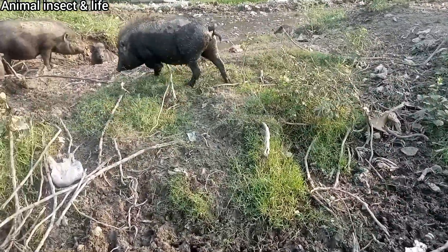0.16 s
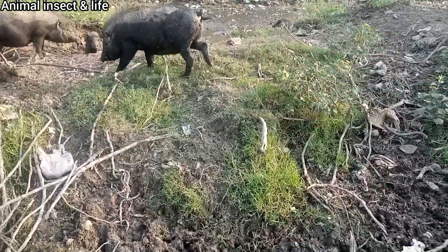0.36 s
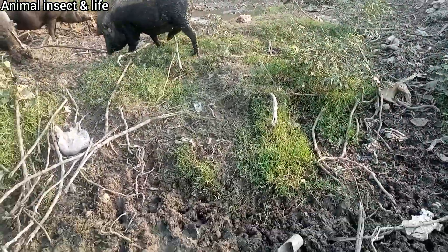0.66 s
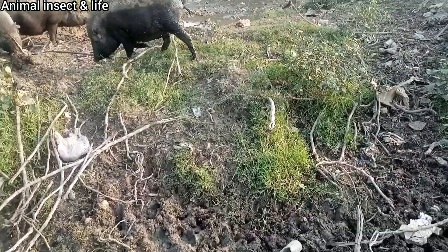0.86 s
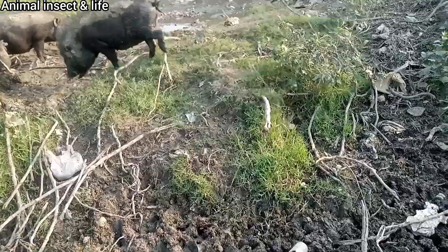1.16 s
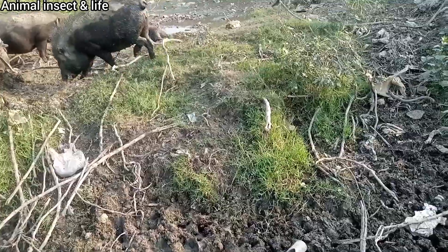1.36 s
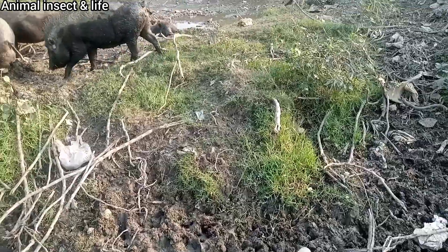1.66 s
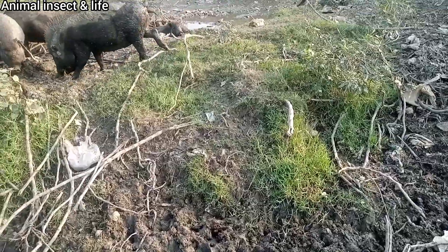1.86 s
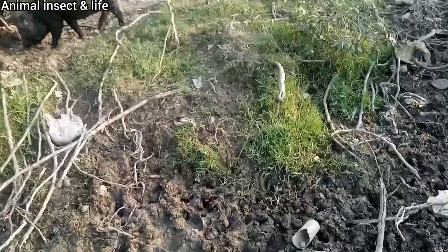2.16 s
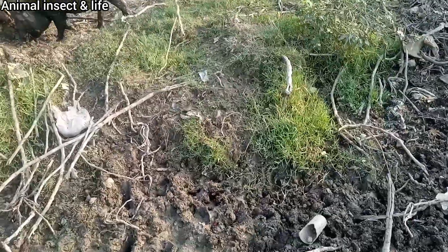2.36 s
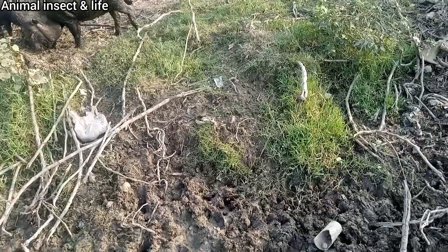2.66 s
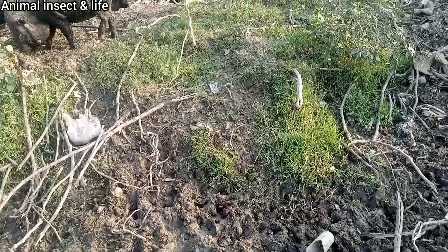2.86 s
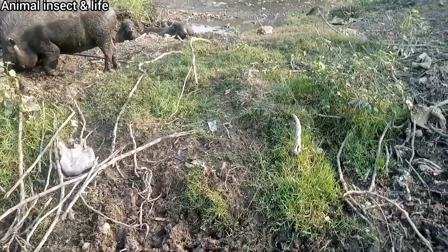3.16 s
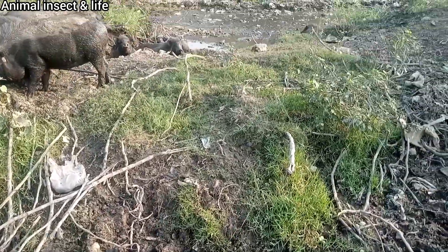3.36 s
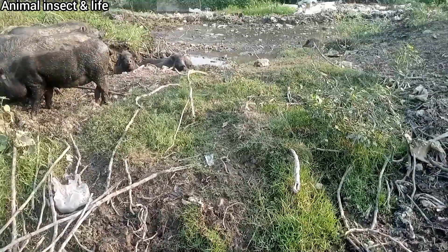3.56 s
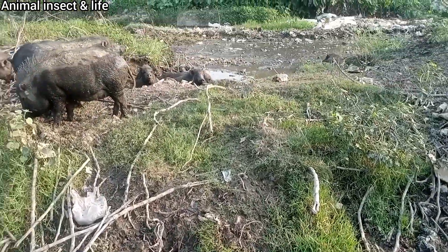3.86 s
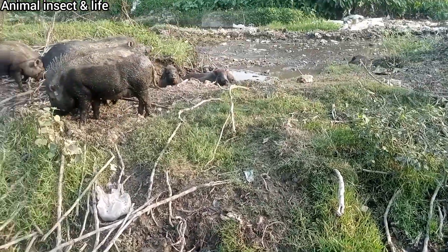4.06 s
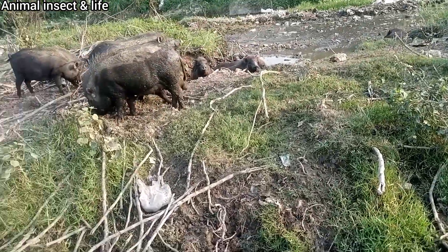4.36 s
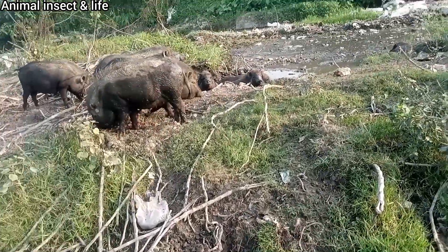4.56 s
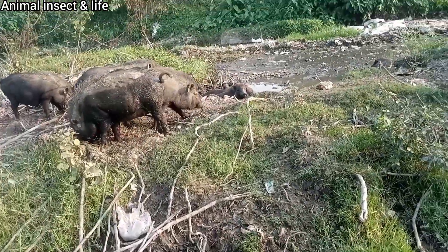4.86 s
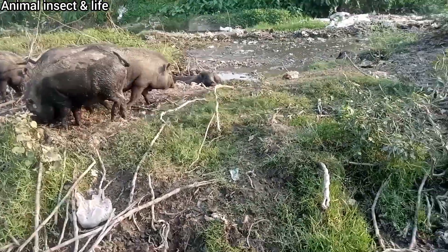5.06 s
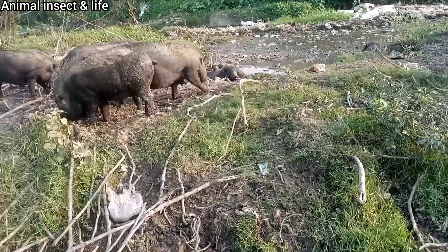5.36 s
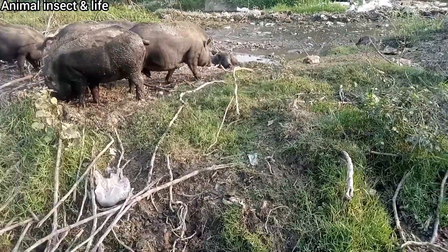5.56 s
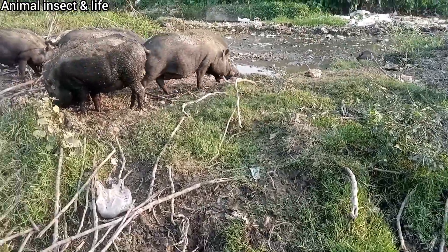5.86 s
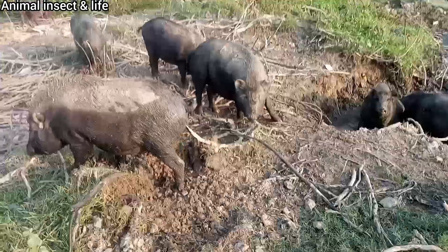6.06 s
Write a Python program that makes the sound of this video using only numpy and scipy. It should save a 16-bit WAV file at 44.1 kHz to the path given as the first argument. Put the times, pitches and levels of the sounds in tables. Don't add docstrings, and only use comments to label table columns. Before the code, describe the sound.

For about six seconds a continuous shrill twitter of hundreds of far birds fills the open air, slightly fluctuating. A faint low diesel pump throbs at a distance, growing a little after 3 s. A stalk snaps at once; buzzing calls follow around 0.25 s. From 0.85 to 1.3 s near birds burst into bright whistles, trills and babble, then buzz and tick at 1.5 s. Another loud cluster runs from 1.9 to 2.4 s, with faint nasal pig whimpers and a mud pop around 2.3 s. Calls thin somewhat, with hooked chirps at 3 s, a whimper and snap at 3.9 s, and harsh rasps at 4.2 and 4.5 s. Soft pulsing grunts come at 4.6 and 5.65 s. Dry crackles and leaf hisses recur throughout. More chatter and rasping follow at 5.1 to 5.9 s, a dull microphone bump near 6 s, then falling whistles. Short leafy echoes surround the near sounds.

```python
import sys
import numpy as np
from scipy import signal
from scipy.fft import rfft, irfft, next_fast_len
from scipy.io import wavfile
from scipy.ndimage import uniform_filter1d, map_coordinates

SR = 44100
rng = np.random.default_rng(int(sys.argv[2]) if len(sys.argv) > 2 else 0)


def field_ratio(decibels):
    return 10 ** (np.asarray(decibels, dtype=float) / 20)


def output_pcm(signal):
    pcm = np.clip(np.atleast_2d(signal).T, -1, 1) * 32767
    wavfile.write(sys.argv[1], SR, np.round(pcm).astype(np.int16))


N = 273420

# [t/s, level/dB]
FLOCK_LIVELINESS = [(0.0, -36.5), (0.22, -35), (0.41, -32.5), (0.79, -35.5), (1.59, -32), (1.76, -35),
                    (2.23, -33), (2.78, -37.5), (4.07, -36), (4.23, -33), (4.66, -35), (4.78, -40.5),
                    (5.02, -34.5), (5.3, -36), (5.51, -35.5), (6.2, -32.5)]
# [f/Hz, level per Hz/dB]
TWITTER_SPECTRUM = [(880, -73), (1500, -12.5), (1900, -7), (3080, 4.5), (4410, 1.5), (5410, -2.5),
                    (6000, -15.5), (7800, -29), (13200, -120)]
# [f/Hz, level per Hz/dB]
SHRILL_SPECTRUM = [(2940, -62), (5000, -15), (5650, 2.5), (6740, 7), (7620, -1), (10500, -21.5),
                   (13400, -37), (14800, -30), (15500, -39)]
# [t/s, level/dB]
PUMP_THROB = [(0.0, -52), (0.15, -53), (2.11, -51), (3.28, -47), (3.57, -48), (4.75, -44), (5.37, -46),
              (5.77, -45), (6.2, -50)]
# [multiple, level/dB]
FIRING_ORDERS = [(1, -37), (2, -8), (3, -9), (4, 0), (5, -5), (6, -5.5), (7, -5.5), (8, -13), (9, -11.5),
                 (10, -16), (11, -16.5)]
# [f/Hz, level per Hz/dB]
ROAR_SPECTRUM = [(18, -44), (30, -14.5), (124, 0.5), (160, -1.5), (241, -15), (358, -11.5), (470, -17.5),
                 (709, -9), (1000, -17.5), (1240, -14), (1870, -20.5), (2200, -33), (2860, -26),
                 (4840, -120)]
# [t/s, f/Hz, level/dB]
PIPS = [(.724, 6647, -35.5), (1.195, 3040, -31), (1.285, 3290, -22), (1.719, 3100, -27.5),
        (2.368, 3350, -23), (2.397, 3230, -17), (2.401, 6650, -29.5), (3.507, 2420, -35),
        (3.7, 3114, -34.5), (4.323, 4510, -31), (5.176, 4303, -25)]
# [t/s, length/s, f/Hz, level/dB]
HELD_NOTES = [(0.0, .012, 2340, -31), (.975, .003, 6660, -24), (.982, .003, 6750, -23),
              (1.003, .006, 7580, -29), (.908, .009, 2930, -21), (.02, .01, 3300, -37),
              (.045, .012, 3400, -36), (.066, .035, 3200, -38), (.69, .012, 2850, -35),
              (4.497, .008, 6700, -36), (1.885, .008, 6150, -34), (5.976, .007, 2650, -31),
              (5.403, .005, 4620, -35), (4.484, .01, 2650, -32), (4.503, .006, 2800, -33),
              (2.225, .04, 4200, -35), (2.44, .03, 2800, -33), (1.319, 0.007, 6680, -27.5),
              (1.315, 0.021, 3190, -21), (1.338, 0.035, 3276, -32.5), (1.356, 0.043, 2400, -44),
              (0.502, 0.008, 6500, -33), (2.098, 0.027, 7540, -34.5), (1.622, 0.039, 2940, -32),
              (1.761, 0.015, 3060, -24.5), (.92, 0.031, 2900, -34), (1.002, 0.0086, 3800, -28),
              (1.47, 0.023, 2150, -39), (1.445, .02, 6650, -38), (5.514, 0.024, 6550, -44),
              (0.212, 0.018, 3100, -44), (1.865, 0.03, 4960, -33), (2.056, 0.041, 3730, -26.5),
              (2.146, 0.0072, 2900, -33), (2.514, .018, 4480, -30), (2.627, 0.028, 2980, -33.5),
              (3.159, 0.032, 2820, -38), (3.5, 0.013, 3480, -35), (3.529, .03, 2600, -40),
              (3.745, .015, 2980, -37), (3.567, 0.039, 4830, -38), (3.75, .081, 4340, -35.5),
              (4.196, 0.031, 2700, -31.5), (4.267, 0.04, 4250, -34), (4.372, 0.15, 4346, -36.5),
              (4.583, 0.028, 2780, -30), (5.648, .037, 2740, -40), (5.791, 0.056, 1960, -44),
              (6.0, 0.074, 3300, -38), (6.09, 0.054, 5730, -33)]
# [t/s, length/s, f/Hz, level/dB]
BRASSY_NOTES = [
    (1.021, 0.018, 3387, -28.5),
    (1.041, 0.042, 3390, -22),
    (1.092, 0.04, 3370, -40),
    (2.197, 0.063, 3440, -34.5),
]
# [t/s, length/s, start f/Hz, end f/Hz, level/dB]
GLIDES = [(1.12, 0.058, 3650, 2340, -40), (1.204, 0.033, 3390, 4150, -29), (1.237, .03, 4150, 4800, -23),
          (1.205, 0.029, 6940, 7900, -32), (.16, .022, 4200, 5000, -37), (1.98, .014, 5550, 5350, -33),
          (2.008, 0.028, 4950, 4400, -27), (2.926, .015, 2470, 2900, -37), (2.944, .012, 2900, 2530, -34),
          (2.96, .01, 2600, 2900, -36), (5.38, .012, 5100, 5970, -43), (5.438, .012, 5030, 6300, -41),
          (1.615, .11, 3675, 3895, -29.5), (1.892, 0.038, 3960, 3580, -28), (2.033, 0.012, 2940, 2720, -23),
          (2.045, 0.084, 2400, 2900, -29), (2.092, 0.03, 3970, 3590, -26.5),
          (2.157, 0.0455, 2947, 3330, -26.5), (2.288, 0.034, 3590, 3950, -26),
          (2.33, 0.018, 4140, 4720, -22), (2.892, 0.028, 2665, 2140, -38),
          (3.024, 0.073, 2300, 2610, -39.5)]
# [t/s, length/s, start f/Hz, end f/Hz, level/dB]
SONG_STROKES = [(4.088, .007, 2600, 2900, -30), (4.098, .008, 2800, 3200, -27),
                (4.138, .01, 2500, 2900, -33), (4.153, .008, 3200, 2700, -31),
                (4.145, .022, 3750, 3900, -35), (4.025, .018, 3350, 3750, -36),
                (4.252, .03, 3900, 2500, -33), (4.682, .014, 4250, 3900, -28), (4.7, .033, 3650, 4150, -30),
                (4.737, .014, 4150, 4350, -29), (4.726, .009, 5300, 4800, -39),
                (4.768, .01, 4400, 3950, -31), (4.778, .008, 3950, 4300, -30), (4.8, .018, 4350, 3850, -30),
                (4.55, .035, 3200, 2800, -32), (.767, .065, 2080, 2330, -35),
                (2.305, .018, 7550, 8100, -31), (4.91, 0.097, 2010, 2320, -45),
                (5.195, 0.073, 3850, 4410, -32), (5.201, 0.046, 2850, 2950, -38.5),
                (5.361, 0.015, 4040, 4960, -32), (5.41, 0.026, 2950, 4800, -31.5),
                (5.478, 0.024, 2810, 4720, -29.5), (6.07, 0.035, 5350, 4750, -35.5),
                (6.108, 0.02, 4600, 3750, -27), (6.13, 0.033, 4550, 3100, -26),
                (6.162, .033, 3050, 2050, -34), (5.96, .022, 2950, 2500, -35)]
# [t/s, length/s, start f/Hz, end f/Hz, level/dB]
SWEEPS = [(.455, .027, 6300, 3720, -37.5), (.508, .024, 4300, 2677, -35), (.512, 0.032, 6400, 3300, -36),
          (.575, 0.02, 4300, 2700, -32.5), (.582, 0.031, 5800, 3330, -35), (3.778, .085, 3430, 2910, -35.5),
          (3.82, .06, 6600, 3810, -34), (3.88, 0.07, 3800, 3390, -40), (4.05, .024, 4450, 2700, -31.5),
          (4.11, .026, 4300, 2550, -34), (4.168, 0.039, 4850, 2670, -35.5), (5.455, .012, 4800, 2800, -32),
          (6.095, 0.036, 2430, 1586, -46)]
# [t/s, peak level/dB, ring level/dB]
STALK_SNAPS = [(0.0268, -29, 13), (0.636, -38, 9), (0.812, -40.5, -6), (1.3513, -30, -18),
               (2.8185, -37.5, 10), (3.566, -46.5, 3), (3.714, -41, 2), (3.937, -30, 4.5),
               (4.3373, -30.5, 6.5), (4.4811, -51.5, 18), (5.1213, -42.5, 23.5), (5.1864, -37, 11),
               (5.3574, -38, 2.5), (5.942, -35, 9), (6.0512, -33.5, 4)]
# [t/s, peak level/dB, f/Hz]
MUD_POPS = [
    (2.3047, -32.5, 1223),
    (2.65, -37, 1230),
    (4.567, -36.5, 1185),
]
# [t/s, syllables, period/s, f/Hz, level/dB]
TRILLS = [(.851, 3, .0255, 2960, -20), (1.902, 3, .032, 3170, -22), (1.901, 3, .032, 6340, -33),
          (1.988, 4, .0135, 3020, -25), (2.168, 3, .013, 3170, -22), (2.545, 3, .023, 3220, -30),
          (2.545, 3, .023, 2680, -33), (2.765, 3, .024, 2730, -33), (3.233, 4, .021, 3430, -33),
          (3.95, 6, .02, 2060, -43), (4.015, 3, .02, 2420, -35), (4.48, 4, .05, 8000, -46),
          (5.418, 3, .018, 2020, -43), (5.506, 3, .0197, 2520, -33), (5.562, 1, .024, 2520, -30),
          (3.391, 7, .0199, 4650, -35.5), (3.446, 1, .035, 2350, -37), (3.487, 1, .016, 2330, -37),
          (5.78, 4, .021, 6650, -43)]
# [t/s, syllables, period/s, start f/Hz, level/dB]
CHATTERS = [
    (4.806, 5, .018, 3550, -38),
    (5.503, 3, .0195, 3300, -30),
    (5.56, 1, .024, 3200, -28),
]
# [t/s, syllables, period/s, start f/Hz, level/dB]
TICKS = [(.152, 2, .017, 3300, -27), (.197, 2, .042, 3000, -32), (.2, 2, .041, 2200, -33),
         (.259, 2, .021, 3000, -39), (3.409, 3, .039, 7200, -36), (1.415, 1, .01, 2900, -36),
         (1.426, 1, .01, 3900, -29), (1.439, 4, .0134, 6600, -39), (1.493, 9, .0133, 6900, -31),
         (1.896, 3, .0325, 5300, -21), (5.393, 1, .01, 4900, -30), (5.456, 2, .024, 4400, -33),
         (5.482, 5, .0197, 4500, -30)]
# [t/s, syllables, period/s, start f/Hz, level/dB]
HOOKS = [
    (2.962, 1, .034, 5600, -35),
    (2.996, 2, .034, 5300, -33),
    (3.063, 3, .0335, 5200, -30.5),
]
# [t/s, syllables, period/s, start f/Hz, level/dB]
ZIGZAGS = [(3.392, 4, .04, 4450, -37)]
# [t/s, length/s, low f/Hz, high f/Hz, level/dB]
WARBLES = [
    (.366, .135, 2000, 2500, -35),
    (2.667, .19, 3000, 7600, -40),
    (5.228, .17, 2200, 3300, -37),
]
# [t/s, length/s]
LEAF_RUSTLES = [(.24, .25), (0.56, 0.083), (0.768, .045), (1.17, 0.04), (1.27, .07), (1.46, .17),
                (1.89, .09), (3.58, 0.089), (4.663, 0.029), (6.097, .07), (5.1, .14), (5.9, .16)]
# [t/s, length/s, centre f/Hz, pulse rate/Hz, level/dB]
BUZZES = [(1.245, .055, 6650, 90, -35), (3.97, .06, 4650, 170, -39), (.705, .05, 3100, 120, -36),
          (.245, 0.225, 3780, 150, -29), (0.27, 0.21, 3000, 125, -38.5), (1.43, 0.46, 2230, 180, -48),
          (1.425, 0.078, 3100, 150, -30.5), (1.02, 0.085, 2650, 110, -34.5), (.965, .05, 2450, 131, -37.5),
          (1.9, 0.1, 2550, 110, -37), (1.483, 0.131, 3610, 76, -23), (1.485, .13, 7480, 100, -34),
          (3.291, 0.19, 3380, 115, -41.5), (4.952, 0.11, 4250, 190, -43)]
# [t/s, length/s, start f/Hz, end f/Hz, level/dB]
RASPS = [(3.63, .115, 3550, 3550, -31), (4.212, .15, 3750, 4000, -28), (.26, .2, 6230, 6230, -46),
         (4.525, .17, 3500, 3700, -26.5), (5.102, .11, 3770, 3850, -29.5), (5.73, .185, 3500, 4000, -27.5),
         (5.37, .2, 3500, 3300, -39)]
# [t/s, length/s, start f/Hz, end f/Hz, level/dB]
BABBLES = [(0.86, .1, 3200, 4500, -33), (.925, .045, 4400, 4650, -29), (.965, .045, 4600, 4600, -31),
           (1.265, .07, 4800, 4500, -34), (4.03, .06, 4900, 4900, -40), (4.455, .06, 4500, 4300, -31),
           (1.27, .11, 2450, 2500, -38), (1.269, 0.12, 3340, 3204, -35.5), (1.617, 0.17, 3450, 3400, -31),
           (1.868, 0.13, 3600, 3400, -37), (1.956, .08, 5300, 4600, -31), (2.04, 0.095, 3610, 3800, -29),
           (2.349, 0.13, 3193, 2970, -30), (2.497, 0.18, 3570, 3350, -35.5), (3.03, 0.18, 3645, 3690, -33),
           (3.37, .17, 6300, 6200, -43), (2.48, .11, 4000, 4200, -35), (5.06, .06, 4300, 3800, -37),
           (2.86, .07, 2960, 2550, -38), (5.48, 0.093, 3800, 3600, -34), (4.714, 0.17, 4024, 2780, -46),
           (5.93, 0.22, 3500, 3480, -35.5)]
# [t/s, length/s, start f/Hz, end f/Hz, level/dB]
WHIMPERS = [
    (2.086, 0.11, 628, 657, -51.5),
    (2.273, 0.046, 670, 577, -48),
    (2.311, 0.0516, 802, 633, -50.5),
    (3.91, 0.087, 454, 556, -48.5),
]
# [t/s, length/s, pulse rate/Hz, level/dB]
GRUNTS = [
    (4.622, 0.31, 30, -45.5),
    (5.64, .28, 38, -43),
]
# [f/Hz, width/Hz, level/dB]
SNOUT = [
    (130, 110, -13),
    (253, 57, 2.5),
    (616, 120, -23),
]


def unit(x):
    return x / np.sqrt(np.mean(x ** 2) + 1e-20)


def along(points, hz):
    f, v = np.transpose(points)
    return np.interp(np.log(hz + 1), np.log(f + 1), v)


def curve(rows):
    s, values = np.transpose(rows)
    return np.interp(np.arange(N) / SR, s, values)


def wobble(rate, size=N):
    knots = rng.standard_normal(int(size * rate / SR) + 4)
    return map_coordinates(knots, [np.arange(size) * rate / SR])


def filtered(x, response):
    m = next_fast_len(N + SR // 2)
    return irfft(rfft(x, m) * response(np.fft.rfftfreq(m, 1 / SR)), m)[:N]


def modes(rows):
    def response(f):
        total = 0
        for k, (centre, width, db) in enumerate(rows):
            damping = 1j * f * width
            total = total + (-1) ** k * field_ratio(db) * damping / (centre ** 2 - f * f + damping)
        return total
    return response


def add(out, s, x):
    part = out[max(round(s * SR), 0):][:len(x)]
    part += x[:len(part)]


def voice(hz, second_db, third_db, edge):
    turn = 2 * np.pi * (np.cumsum(hz) / SR + rng.random())
    t = np.arange(len(hz)) / SR
    ends = np.sin(np.pi / 2 * np.clip(np.minimum(t, t[::-1]) / edge, 0, 1))
    overtones = field_ratio(second_db) * np.sin(2 * turn) + field_ratio(third_db) * np.sin(3 * turn)
    return ends * (np.sin(turn) + overtones)


def glide(length, start_hz, middle_hz, end_hz):
    u = np.linspace(0, 1, int(length * SR))
    return start_hz * (1 - u) * (1 - 2 * u) + 2 * middle_hz * u * (2 - 2 * u) + end_hz * u * (2 * u - 1)


def far_flock():
    u, layers = np.linspace(0, 1, 1600), []
    bands = ((TWITTER_SPECTRUM, 2000, 3200, 1), (SHRILL_SPECTRUM, 5200, 3200, 3))
    for spectrum, low_hz, span_hz, blur_db in bands:
        chirps = np.zeros(N)
        for when, pitch, slope, life, size in rng.random((1100, 5)):
            v = u[:int(300 + 1300 * life ** 2)]
            sweep_hz = 4200 * (slope - .65) * (1.1 - life)
            hz = low_hz + span_hz * pitch + sweep_hz * v / v[-1]
            tone = np.sin(2 * np.pi * np.cumsum(hz) / SR)
            add(chirps, when * N / SR, field_ratio(6 * size) * np.hanning(len(v)) * tone)
        echoes = field_ratio(blur_db + 3 * wobble(14) + 1.8 * wobble(4)) * rng.standard_normal(N)
        band = (span_hz / (SR / 2)) ** .5
        blend = band * unit(chirps) + echoes
        layers.append(unit(filtered(blend, lambda f: field_ratio(along(spectrum, f)))))
    lively_db = curve(FLOCK_LIVELINESS)
    mean_db = lively_db.mean()
    shrill_db = mean_db - 9.2 + 1.2 * (lively_db - mean_db)
    return field_ratio(lively_db - 3.7) * layers[0] + field_ratio(shrill_db) * layers[1]


def distant_pump():
    firing_hz, split_hz = 26.48, 520
    throb_db = curve(PUMP_THROB)
    turn = 2 * np.pi * np.cumsum(firing_hz * (1 + 0.00568 * wobble(1.544))) / SR
    orders = np.zeros(N)
    for k, db in FIRING_ORDERS:
        phase = k * turn + 0.1006 * k * k + 0.83 * wobble(6)
        orders += field_ratio(db + 1.16 * wobble(7.3)) * np.cos(phase)
    pulsed = rng.standard_normal(N) * (1 + 0.2 * np.cos(turn))
    roar = unit(filtered(pulsed, lambda f: field_ratio(along(ROAR_SPECTRUM, f))))
    low = filtered(roar, lambda f: 1 / (1 + (f / split_hz) ** 8))
    swell_db, parts = throb_db - throb_db.mean(), np.zeros(N)
    for grows, part in ((1.1, low), (.45, roar - low)):
        parts += field_ratio(grows * swell_db + .6 * wobble(3) + 1.4 * wobble(10)) * part
    return field_ratio(throb_db - 0.8) * unit(orders) + field_ratio(-46.4) * parts


def whistles():
    pure_db, brassy_db = (-18, -22), (-5, -9.5)

    def arch(hz, share):
        return hz * (1 - share), hz, hz * (1 - share)

    calls = [(s, .0183, arch(hz, .0406), db, pure_db) for s, hz, db in PIPS]
    for rows, partials_db in ((HELD_NOTES, pure_db), (BRASSY_NOTES, brassy_db)):
        calls += [(s, length, arch(hz, .012), db, partials_db) for s, length, hz, db in rows]
    for rows, done in ((GLIDES, .5), (SONG_STROKES, .5), (SWEEPS, .73)):
        calls += [(s, length, (a, a + done * (b - a), b), db, pure_db) for s, length, a, b, db in rows]
    out = np.zeros(N)
    for s, length, pitch, db, partials_db in calls:
        hz = np.pad(glide(length, *pitch), 130, "edge")
        hz = hz + 28 * wobble(400, len(hz))
        flutter = field_ratio(db + 1.8 * wobble(190, len(hz)))
        add(out, s - .003, flutter * voice(hz, *partials_db, edge=0.005))
    return out


def trees(x):
    t = np.arange(SR // 4) / SR
    tail = rng.standard_normal(len(t)) * field_ratio(-60 * t / 0.089) * (1 - np.exp(-t / 0.0059))
    return signal.fftconvolve(x, tail / np.linalg.norm(tail))[:N]


def rooting():
    out, t = np.zeros(N), np.arange(900) / SR
    small = [(N / SR * when, -65 + 13 * size ** 2, 0) for when, size in rng.random((160, 2))]
    for s, db, ring_db in [*STALK_SNAPS, *small]:
        crack = np.diff(rng.standard_normal(901)) * field_ratio(-60 * t / 0.024)
        ring = np.sin(2 * np.pi * rng.normal(6550, 150) * t) * field_ratio(ring_db - 60 * t / 0.0067)
        add(out, s, field_ratio(db) * (0.51 * crack + 1.63 * ring))
    for s, db, hz in MUD_POPS:
        rising = np.sin(2 * np.pi * hz * t * (1 + 1.26 * t))
        add(out, s, field_ratio(db - 60 * t / 0.046) * rising * (1 - np.exp(-t / 0.00043)))
    return out


def trills():
    def bend(length, end):
        return glide(length, 0.93, .35 + .65 * end, end)

    def hook(period):
        u = glide(.8 * period, 0, .5, 1)
        return .675 - .17 * u ** 2.5 + .325 * np.exp(-u / .085)

    # table, pitch shape over one period, second partial in dB
    kinds = ((TRILLS, lambda period: bend(.54 * period, .98), -21),
             (CHATTERS, lambda period: bend(.62 * period, .7), -21),
             (TICKS, lambda period: glide(.0055, 1, .81, .62), -18),
             (HOOKS, hook, -15),
             (ZIGZAGS, lambda period: glide(.01, 1, 1.12, 1.5), -25))
    out = np.zeros(N)
    for rows, shape, second_db in kinds:
        for s, count, period, start_hz, db in rows:
            for k in range(int(count)):
                hz = start_hz * shape(period) * rng.normal(1, 0.0094)
                level = field_ratio(db + rng.normal(0, 1) + 2 * wobble(150, len(hz)))
                add(out, s + k * period, level * voice(hz, second_db, -36, edge=.0022))
    for s, length, low_hz, high_hz, db in WARBLES:
        t = np.arange(int(length * SR)) / SR
        swing = 1 - np.abs(np.cos(np.pi * 25.3 * t))
        level = field_ratio(db - 3.6 * swing + wobble(118, len(swing)))
        add(out, s, level * voice(low_hz + (high_hz - low_hz) * swing, -37, -32, edge=0.058))
    return out


def rustles():
    gate = np.zeros(N)
    for s, length in LEAF_RUSTLES:
        add(gate, s, np.hanning(int(length * SR)) ** .5)
    grains = field_ratio(3.9 * wobble(300)) * rng.standard_normal(N)
    hiss = filtered(grains, lambda f: f ** 2 / (f ** 2 + 7000 ** 2))
    return field_ratio(-50) * gate * unit(hiss)


def rasps():
    buzz, rasp, babble = (110, .35, .09, .12, .55), (500, .25, .22, .23, .42), (370, .6, .3, .35, .55)
    buzz_db, rasp_db = (-17, -24), (-14.5, -25)
    calls = [(s, length, hz, hz, rate, db, buzz, buzz_db) for s, length, hz, rate, db in BUZZES]
    for rows, rate, kind in ((RASPS, 250, rasp), (BABBLES, 210, babble)):
        calls += [(s, length, a, b, rate, db, kind, rasp_db) for s, length, a, b, db in rows]
    out = np.zeros(N)
    for s, length, start_hz, end_hz, rate, db, kind, partials_db in calls:
        depth_hz, wander, uneven, swell, pulsing = kind
        n = int(length * SR)
        cycle = 2 * np.pi * np.cumsum(rate * (1 + uneven * wobble(90, n))) / SR
        hz = np.linspace(start_hz, end_hz, n) + depth_hz * (np.sin(cycle) + wander * wobble(45, n))
        grain_db = 1.3 * wobble(60, n) + 2.2 * wobble(330, n)
        level = field_ratio(db + grain_db) * (1 - pulsing * np.cos(cycle))
        add(out, s, level * voice(hz, *partials_db, edge=swell * length))
    return out


def pigs():
    out, pulses = np.zeros(N), np.zeros(N)
    for s, length, start_hz, end_hz, db in WHIMPERS:
        hz = glide(length, start_hz, (start_hz + end_hz) / 2, end_hz)
        add(out, s, field_ratio(db) * voice(hz, -7.0, -8, edge=0.0094))
    for s, length, rate, db in GRUNTS:
        n = int(length * SR)
        turns = np.cumsum(rate * (1 + 0.37 * wobble(30, n))) / SR
        fire = np.diff(np.floor(turns), prepend=0)
        add(pulses, s, field_ratio(db + 49 + 6.4 * wobble(26.5, n)) * fire * np.hanning(n) ** .5)
    return out + filtered(pulses, modes(SNOUT))


def knock():
    out = np.zeros(N)
    add(out, 5.978, field_ratio(-29.5) * np.hanning(int(0.015 * SR)))
    return out


def treble_peak(f):
    return (1 + 0.48 / (1 + ((f - 6700) / 450) ** 2)) / (1 + (f / 8500) ** 8)


def top_dip(f):
    return 1 - 0.85 / (1 + ((f - 13000) / 1300) ** 2) - 0.88 / (1 + (15000 / (f + 1)) ** 30)


def scene():
    birds = filtered(whistles() + trills() + rasps(), treble_peak)
    ground = filtered(rooting() + rustles(), top_dip)
    near = birds + pigs() + ground
    return (near + field_ratio(-9) * trees(near) + far_flock() + distant_pump() + knock())[None]


def low_pass(x):
    return signal.sosfilt(signal.butter(12, 16710, fs=SR, output="sos"), x)


def record(dry):
    cut = filtered(dry[0], lambda f: (1j * f / (30 + 1j * f)) ** 2 * (f < 15800))
    level_db = 10 * np.log10(np.abs(uniform_filter1d(cut ** 2, 2600)) + 1e-9)
    duck_db = -.4 * np.clip(level_db + 25.5, 0, 20)
    mix = (cut * field_ratio(duck_db))[None]
    return low_pass(mix)


dry = scene()
out = record(dry)
output_pcm(out)
```